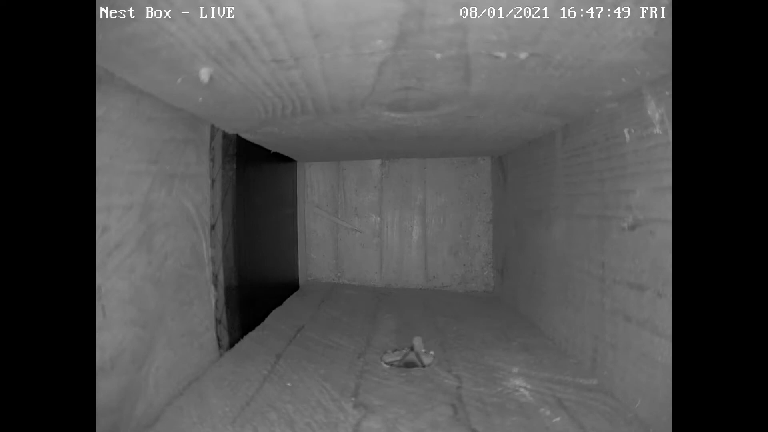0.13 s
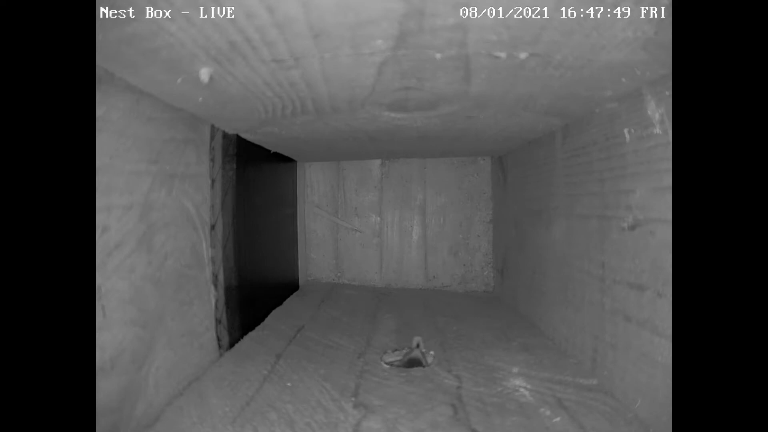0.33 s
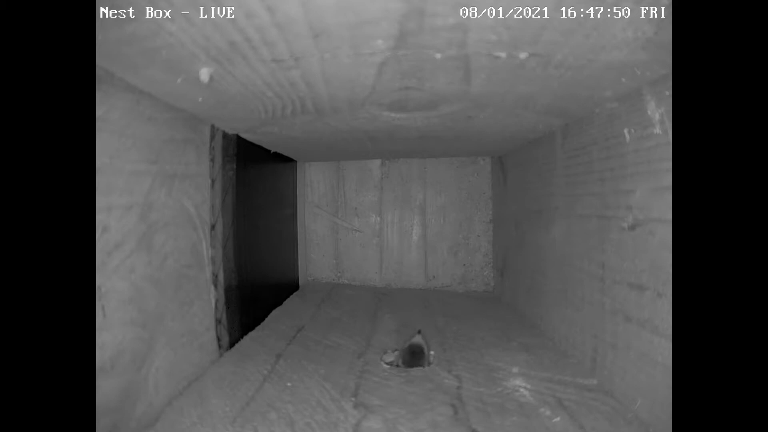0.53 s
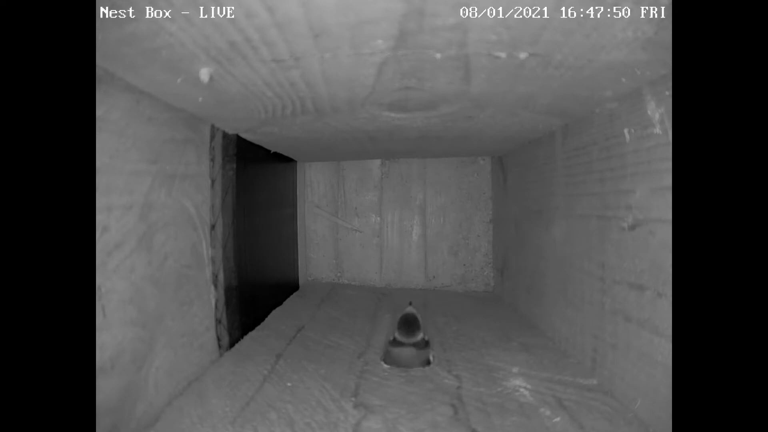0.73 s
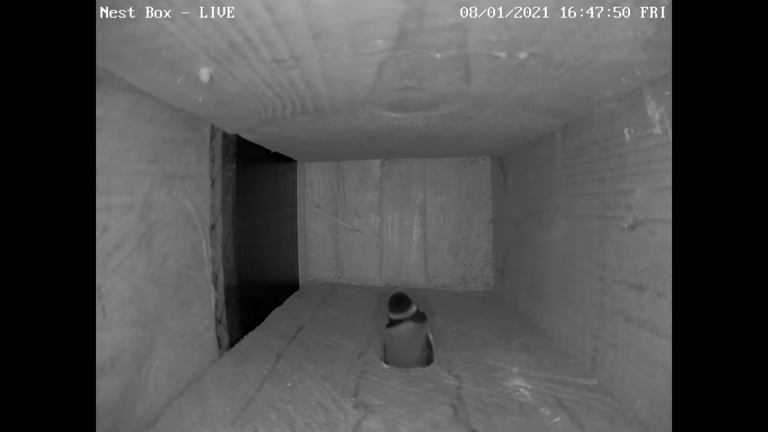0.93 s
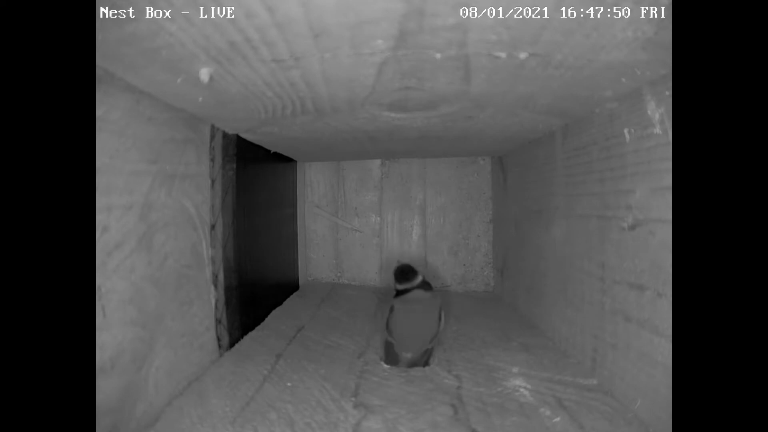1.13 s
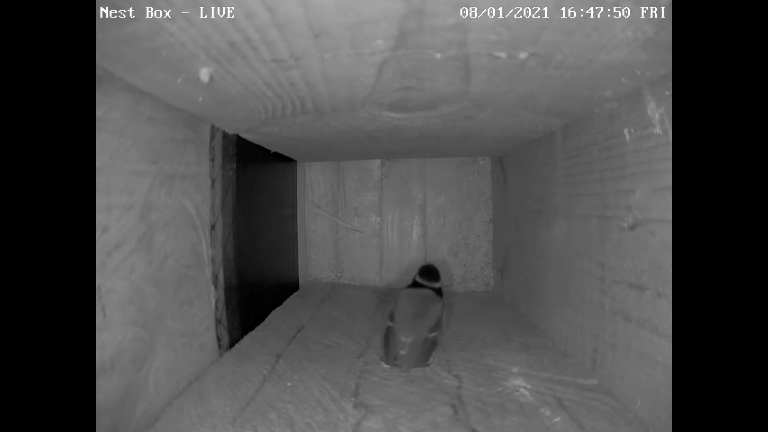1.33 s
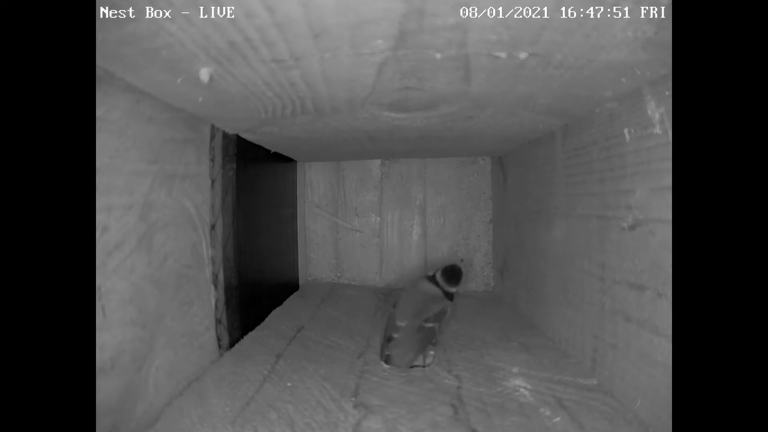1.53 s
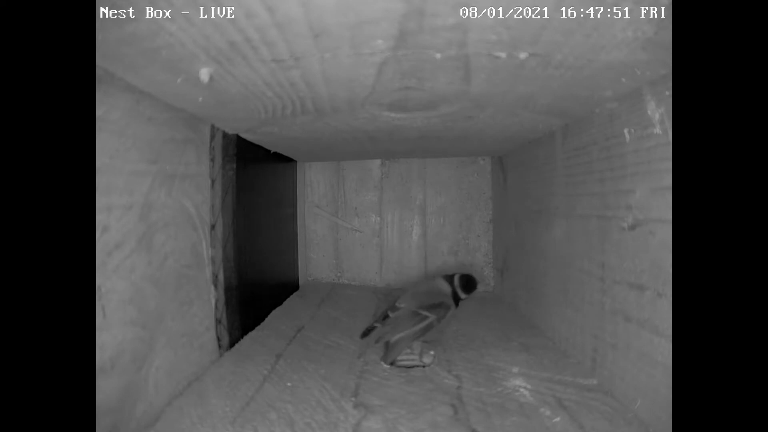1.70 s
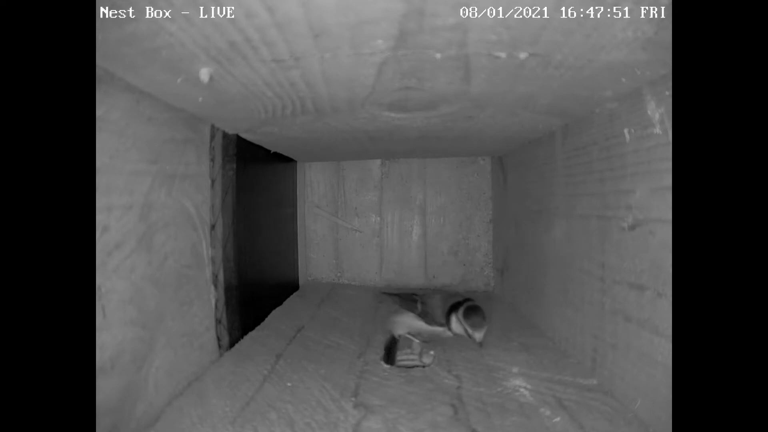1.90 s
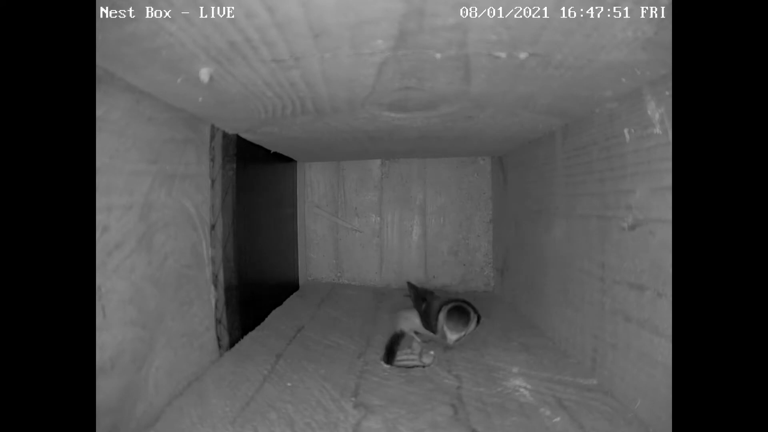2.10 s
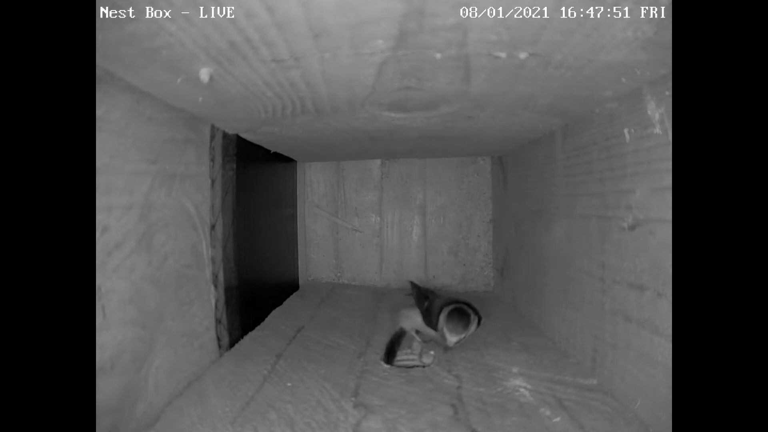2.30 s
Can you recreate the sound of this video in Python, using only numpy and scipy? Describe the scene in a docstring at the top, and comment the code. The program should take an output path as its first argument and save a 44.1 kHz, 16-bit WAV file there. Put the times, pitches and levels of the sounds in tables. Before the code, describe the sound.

A small bird scuffles into a wooden nest box, feathers rubbing, claws scratching, body bumping the panels

```python
"""A low rumble and the hum of outdoor air in a wooden nest box, heard by a microphone in the box; then
a small bird squeezes through the hole and hops inside. Feathers rub in short strokes of dense grains,
bumps ring the panel modes and crack, claws scratch bursts of noise that ring the rim of the hole.
Airborne layers pass a chain of box resonances; bumps, thud and rumble come through the wood.
The link has a steep top cut; it loses its treble twice and clicks once."""
import sys
import numpy as np
from scipy import signal
from scipy.fft import rfft, irfft, next_fast_len
from scipy.io import wavfile
from scipy.ndimage import uniform_filter1d

SR = 44100
rng = np.random.default_rng(int(sys.argv[2]) if len(sys.argv) > 2 else 0)


def store_wav(level_fs):
    """Save 16-bit WAV to argv[1]."""
    pcm = np.round(np.clip(np.atleast_2d(level_fs), -1, 1) * 32767)
    wavfile.write(sys.argv[1], SR, pcm.T.astype(np.int16))


def boost_factor(decibels):
    """Convert a level in decibels to a linear amplitude factor."""
    exponent = np.asarray(decibels, float) / 20
    return 10 ** exponent


N = 103635
TIME_S = np.arange(N) / SR

# spectrum of rubbing and scratching on wood: hz, density_db_per_hz
RUB_SPECTRUM = [(800, -33.5), (1600, -6), (2600, -11), (4000, -3.5), (6500, -5), (7500, 0), (8300, -9.5)]
# bumps of the body on the panels: start_s, level_db, upper_mode_gain_db, crack_db
BODY_BUMPS = [(0.261, -45, -41, -64.5), (0.618, -43, -10.5, -55.5), (.737, -34, -20.5, -59.5),
              (0.761, -44.5, -14.5, -77), (0.907, -32.5, -14, -52), (.946, -36, -14, -74),
              (0.96, -33.5, -18, -73), (0.997, -50.5, -4.5, -82.5), (1.07, -35, -13.5, -53.5),
              (1.109, -34, -26.5, -54), (1.262, -36.5, -14.5, -79), (1.285, -29, -17.5, -41),
              (1.308, -30.5, -15.5, -39), (1.588, -44, -13.5, -71.5), (1.748, -52.5, 5, -71),
              (2.038, -49.5, -1.5, -64)]


def rms_one(x):
    """Scale to rms 1."""
    return x / np.sqrt(np.mean(x ** 2) + 1e-20)


def white():
    """White noise of rms about 1."""
    return rng.standard_normal(N)


def coloured(x, spectrum):
    """Give white input a spectrum of (Hz, dB per Hz) points, joined on a log-frequency axis; rms 1."""
    hz, db = np.transpose(spectrum)
    size = next_fast_len(N)
    log_hz = np.log(np.arange(size // 2 + 1) * SR / size + 1)
    gain = boost_factor(np.interp(log_hz, np.log(hz), db, -80, -80))
    return rms_one(irfft(rfft(x, size) * gain, size)[:N])


def drift(rate_hz):
    """Slow random wander of rms 1: noise through two equal one-pole low-passes."""
    r = np.exp(-2 * np.pi * rate_hz / SR)
    return rms_one(signal.lfilter([1], [1, -2 * r, r * r], rng.standard_normal(N + SR))[SR:])


def ring(x, hz, t60_s):
    """Two-pole resonator: a unit click starts a decaying sine of height 1."""
    r, w = boost_factor(-60 / (t60_s * SR)), 2 * np.pi * hz / SR
    return signal.lfilter([0, np.sin(w)], [1, -2 * r * np.cos(w), r * r], x + 1e-18)


def latest(rows, column):
    """At every sample, a column of the event that began last."""
    rows = np.array(rows)
    index = np.searchsorted(rows[:, 0], TIME_S) - 1
    return rows[np.maximum(index, 0), column]


def shake_level_db():
    """Level of the shaking box over time."""
    # shaking of the box: time_s, level_db
    shake_points = [(.42, -43), (.56, -36), (.66, -37.5), (.73, -36), (.8, -38), (.92, -30.5),
                    (1.03, -32.5), (1.1, -31.5), (1.2, -38.5), (1.3, -31), (1.4, -38.5), (2.1, -42.5),
                    (2.35, -44.5)]
    return np.interp(TIME_S, *np.transpose(shake_points))


def rumble(shake_db):
    """Low noise of the shaking box, following the shake level."""
    # spectrum of the rumble: hz, density_db_per_hz
    shake_spectrum = [(15, -6.5), (28, 3.5), (50, -6.5), (77, -3), (98, -8), (135, -5), (170, -16.5),
                      (230, -35.5), (400, -64)]
    return boost_factor(shake_db) * coloured(white(), shake_spectrum)


def outdoor_air(shake_db):
    """Outdoor noise leaking in; its level follows part of the rumble's swing in dB."""
    # spectrum of the leaking noise: hz, density_db_per_hz
    air_spectrum = [(150, -1), (700, -17), (1500, -17.5), (2500, -30), (4500, -34.5), (8200, -35)]
    base_db, swing_share = -62, 0.47
    level = boost_factor(base_db + swing_share * (shake_db - shake_db.mean()))
    return level * coloured(white(), air_spectrum)


def focused(x, centre_hz, width_oct, lift_db):
    """Lift the quarter-octave bands near a moving centre; each band's level wanders by chance."""
    patchy_db, patchy_hz = 1.7, 22
    edges_hz = 250 * 2 ** np.arange(0, 5.3, 1 / 4)
    out = 0
    for low, high in zip(edges_hz, edges_hz[1:]):
        band = signal.sosfilt(signal.butter(2, [low, high], "band", fs=SR, output="sos"), x)
        distance_oct = np.log2(np.sqrt(low * high) / centre_hz)
        near = np.exp(-.5 * (distance_oct / width_oct) ** 2)
        out = out + band * boost_factor(lift_db * near + patchy_db * drift(patchy_hz))
    return out


def feathers():
    """Dense tiny catches of the barbs on the wood grain, in strokes that rise, hold and fall."""
    # strokes of feathers on wood: start_s, length_s, level_db, rasp_centre_hz
    strokes = [(0.252, 0.017, -62, 3500), (0.689, 0.061, -48.5, 4200), (0.832, 0.062, -52, 4000),
               (0.903, 0.055, -43, 4500), (0.97, 0.036, -46, 4500), (1.039, 0.051, -46, 4500),
               (1.098, 0.01, -41, 5170), (1.205, 0.058, -49.5, 4800), (1.243, 0.054, -40, 5200),
               (1.323, 0.033, -50, 5500), (1.543, 0.059, -55, 5500), (1.612, 0.087, -63.5, 5000),
               (1.713, 0.099, -55.5, 5500), (1.927, 0.031, -67.5, 7000), (1.975, 0.052, -66, 3500),
               (2.019, 0.022, -52.5, 4000), (2.217, 0.036, -62.5, 6000)]
    rise_s, fall_s = 0.014, 0.015
    stir_from_s, stir_db = 0.62, -72.5  # faint steady rustle once the bird fills the hole
    grains_per_s, grain_spread_db = 6000, 0.5

    level = boost_factor(stir_db) * (TIME_S > stir_from_s)
    for start_s, length_s, db, _ in strokes:
        age_s = TIME_S - start_s
        rise = 1 - np.exp(-(np.maximum(age_s, 0) / rise_s) ** 2)
        fall = np.exp(-np.maximum(age_s - length_s, 0) / fall_s)
        level = level + boost_factor(db) * rise * fall

    height = boost_factor(grain_spread_db * np.minimum(rng.exponential(1, N), 5))
    sign = rng.choice([-1, 1], N)
    grains = height * sign * (rng.random(N) < grains_per_s / SR)
    rub = coloured(grains, RUB_SPECTRUM)
    return level * focused(rub, latest(strokes, column=3), width_oct=0.87, lift_db=6)


def bumps():
    """Each bump swells every panel mode through a short contact, with random strength and phase."""
    # panel modes: hz, gain_db, t60_s
    low_modes = [(198, -3.5, 0.047), (273.6, -6.5, 0.11), (359, -3.5, 0.079), (434, -5, 0.026)]
    # upper panel mode, scaled by each bump's hardness: hz, gain_db, t60_s
    high_modes = [(1538, 4.5, 0.1)]
    contact_s, upper_waver_db, upper_waver_hz = 0.015, 2.0, 40

    start_s, level_db, upper_db, _ = np.transpose(BODY_BUMPS)
    length = int(contact_s * SR)
    index = (start_s * SR).astype(int)[:, None] + np.arange(length)
    press = np.hanning(length) * 4 / length
    out = np.zeros(N)
    for k, (hz, mode_db, t60_s) in enumerate([*low_modes, *high_modes]):
        upper = k >= len(low_modes)
        chance_db = rng.normal(0, 1.5, len(start_s))
        phase = rng.random((len(start_s), 1))
        wave = press * np.cos(2 * np.pi * (hz * np.arange(length) / SR + phase))
        gain = boost_factor(level_db + mode_db + chance_db + upper_db * upper)
        push = np.zeros(N)
        np.add.at(push, index, wave * gain[:, None])
        # the upper mode rings unevenly under the moving body
        out += ring(push, hz, t60_s) * boost_factor(upper_waver_db * drift(upper_waver_hz) * upper)
    return out


def cracks():
    """Short broad crack of noise at each bump; a new one cuts off the last."""
    # spectrum of the crack: hz, density_db_per_hz
    crack_spectrum = [(450, 2.5), (800, -10), (4000, -15.5)]
    crack_s = 0.022
    age = np.maximum(TIME_S - latest(BODY_BUMPS, column=0), 0) / crack_s
    envelope = 2 * np.sqrt(age) * np.exp(-2 * age)
    return boost_factor(latest(BODY_BUMPS, column=3)) * envelope * coloured(white(), crack_spectrum)


def claws():
    """Scratches of noise, quick to rise and fall, each ringing the rim modes near its two pitches."""
    # claw scratches: start_s, level_db, first_pitch_hz, second_pitch_hz
    scratches = [(0.623, -46.5, 4250, 4400), (0.6615, -40, 4220, 5540), (0.9596, -35, 6900, 4250),
                 (1.0735, -37, 6900, 5400), (1.1112, -44, 5200, 2600), (1.288, -26, 6000, 7400),
                 (1.3, -33.5, 3400, 2600), (1.3124, -32, 7400, 5200), (1.5936, -42, 4250, 6500),
                 (1.7552, -38.5, 6900, 5400), (1.8027, -41.5, 6500, 5200), (1.9611, -48, 7400, 3050),
                 (2.0426, -39.5, 3050, 4250)]
    # modes of the wood round the hole: hz
    rim_modes_hz = [2600, 3050, 3400, 4250, 5300, 6000, 6600, 7450]
    rise_s, fall_s = 0.0025, 0.006
    rim_t60_s, rim_db, reach_oct = 0.016, -19, 0.09

    envelope = 0
    for start_s, db, *_ in scratches:
        age_s = np.maximum(TIME_S - start_s, 0)
        envelope = envelope + boost_factor(db) * (1 - np.exp(-age_s / rise_s)) * np.exp(-age_s / fall_s)
    scratch = envelope * white()
    # the gradient brightens the direct scrape
    out = envelope * rms_one(np.gradient(coloured(white(), RUB_SPECTRUM)))
    for hz in rim_modes_hz:
        near = 0
        for column in (2, 3):
            distance_oct = np.log2(hz / latest(scratches, column))
            near = near + np.exp(-.5 * (distance_oct / reach_oct) ** 2)
        out = out + boost_factor(rim_db) * ring(scratch * near, hz, rim_t60_s)
    return out


def thud():
    """Heavy landing on the rim: one smoothed push rings two low modes."""
    # modes rung by the landing: hz, gain_db, t60_s
    thud_modes = [(81.5, -25.5, 0.1), (139, -13.5, 0.13)]
    start_s = 1.0808
    push = np.zeros(N)
    push[int(start_s * SR)] = -1
    push = uniform_filter1d(push, size=150)
    return sum(boost_factor(db) * ring(push, hz, t60_s) for hz, db, t60_s in thud_modes)


def box_air(x):
    """Air of the box at the microphone: a chain of peaking and notching two-pole filters."""
    # air resonances and nulls: hz
    centres_hz = [352, 632, 800, 1175, 1360, 1558, 1732, 2140, 2315, 2420, 2545, 3020, 5800, 6280, 6500]
    # their widths and gains, + resonance, - null: width_hz, gain_db
    peaks = [(27, 19), (32.8, 11.5), (49, 6), (79, 11), (71, -23), (49, 10.5), (60, 5), (59.5, -14),
             (94, 7.5), (35, -15.5), (53, 8.5), (60, 6.5), (100, -5), (98, -9), (300, 4.5)]
    for hz, (width_hz, db) in zip(centres_hz, peaks):
        w, g = 2 * np.pi * hz / SR, boost_factor(db / 2)
        a = np.pi * width_hz / SR
        zeros = [1 + a * g, -2 * np.cos(w), 1 - a * g]
        poles = [1 + a / g, -2 * np.cos(w), 1 - a / g]
        x = signal.lfilter(zeros, poles, x)
    return x


def scene():
    """Airborne sounds pass through the box air; bumps, thud and rumble come through the wood."""
    shake_db = shake_level_db()
    airborne = outdoor_air(shake_db) + feathers() + cracks() + claws()
    through_wood = rumble(shake_db) + bumps() + thud()
    return (box_air(airborne) + through_wood)[None]


def low_pass(x, order, hz):
    """Steep zero-phase top cut."""
    return signal.sosfiltfilt(signal.butter(order, hz, fs=SR, output="sos"), x)


def link_click():
    """The signal jumps once and decays: a sharp click."""
    start_s, level_db, fade_s = 0.6233, -38, 0.001
    age_s = TIME_S - start_s
    return boost_factor(level_db) * (age_s > 0) * np.exp(-np.abs(age_s) / fade_s)


def roll_off(x):
    """The treble ends steeply here."""
    return signal.sosfilt(signal.butter(12, 16000, fs=SR, output="sos"), x)


def record(dry):
    """Narrow link: steep top cut, two crossfaded treble dropouts, one click."""
    # treble dropouts: start_s, end_s
    dropout_spans = [(.597, .633), (1.984, 2.104)]
    wide = low_pass(dry, order=11, hz=7337)
    narrow = low_pass(dry, order=16, hz=4500)
    dropped = np.zeros(N)
    for start_s, end_s in dropout_spans:
        dropped[(TIME_S >= start_s) & (TIME_S <= end_s)] = 1
    dropped = uniform_filter1d(dropped, size=200)
    return roll_off(wide * (1 - dropped) + narrow * dropped + link_click())


dry = scene()
out = record(dry)
store_wav(out)
```